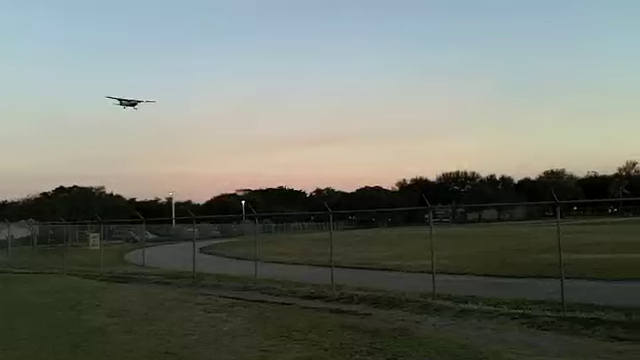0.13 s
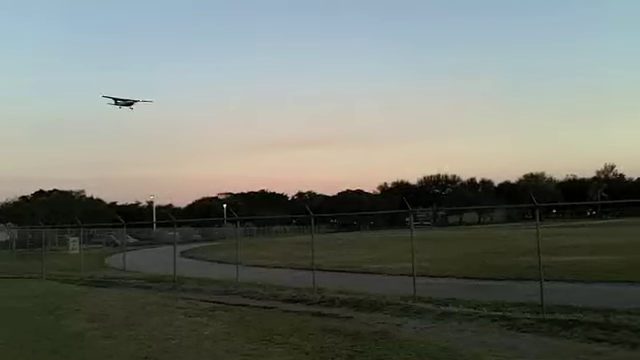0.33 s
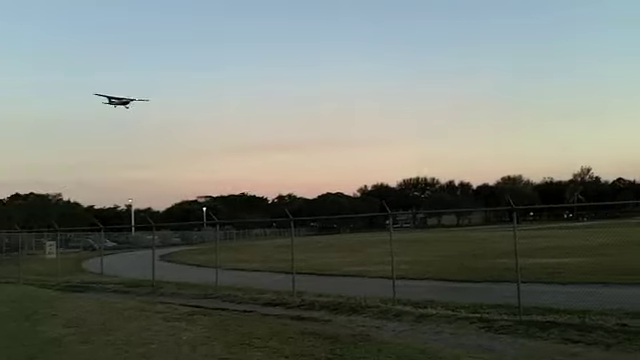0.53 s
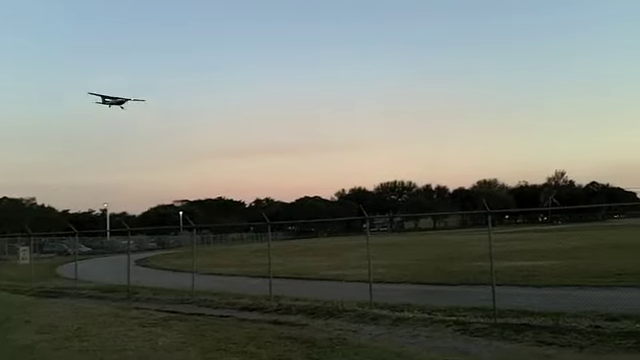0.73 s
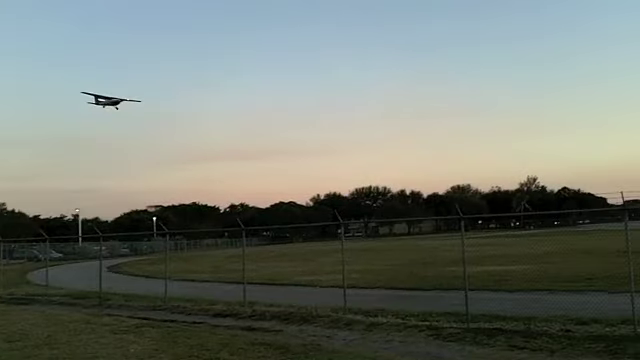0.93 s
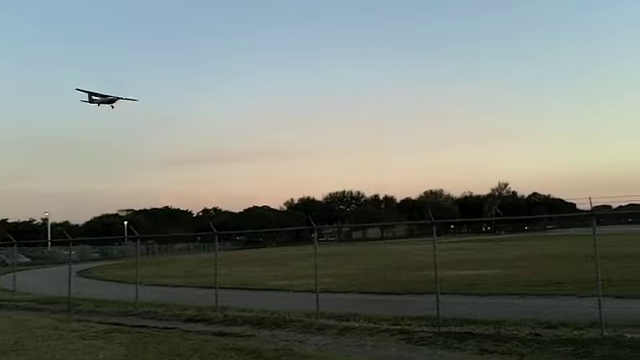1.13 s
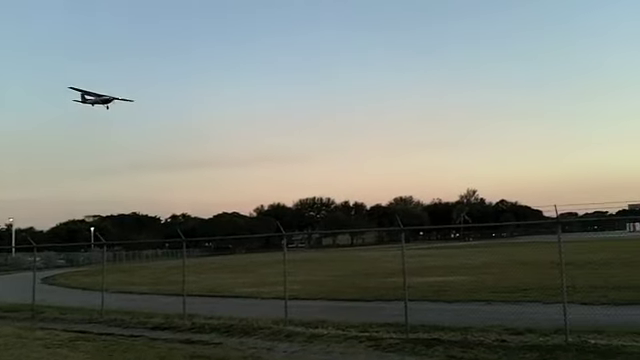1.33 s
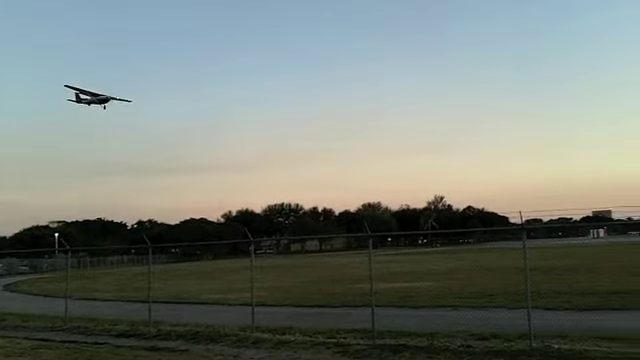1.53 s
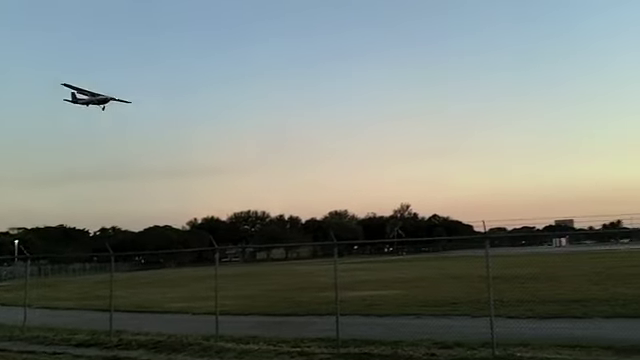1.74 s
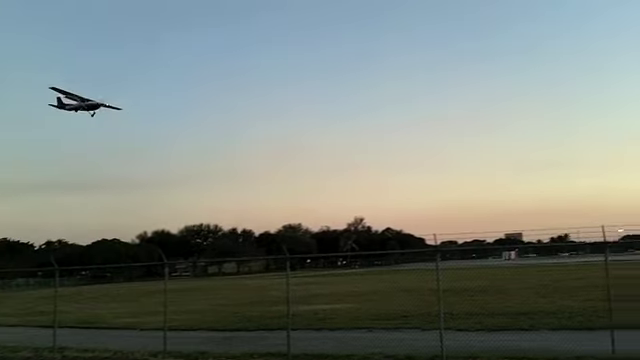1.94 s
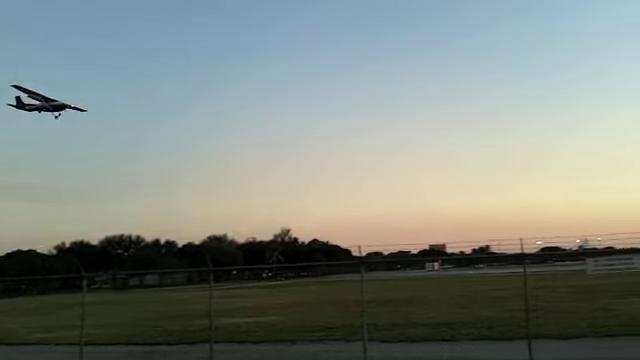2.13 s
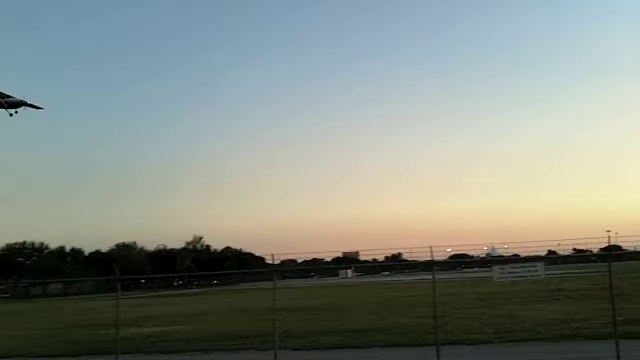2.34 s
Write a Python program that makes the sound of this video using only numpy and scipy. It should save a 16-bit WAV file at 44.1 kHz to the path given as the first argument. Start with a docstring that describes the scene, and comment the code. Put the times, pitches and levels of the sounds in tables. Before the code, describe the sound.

A small propeller plane drones in low over an open airfield, growing louder and brighter as it nears the microphone while its pitch slowly sinks. Further off, idling engines throb and clatter over a low rumble.

```python
"""An airfield, with a small propeller plane coming in low. Its drone sinks in pitch and grows louder and
brighter as it nears, and its exhaust ticks once a shaft turn. Sound bouncing off the ground arrives ever
later and mixes with it in a slow downward sweep. Further off, idling engines throb against the drone.
The recorder fades in, whines faintly and cuts a few deep notches in the treble."""
import sys
import numpy as np
from scipy.fft import rfft, irfft, next_fast_len
from scipy.io import wavfile
from scipy.ndimage import map_coordinates

SR = 44100
rng = np.random.default_rng(int(sys.argv[2]) if len(sys.argv) > 2 else 0)


def master(y):
    """Save y as 16-bit WAV."""
    cut = np.clip(np.atleast_2d(y).T, -1, 1)
    pcm = np.round(cut * 32767)  # scale
    wavfile.write(sys.argv[1], SR, pcm.astype(np.int16))


N = 110250


def amp(db):
    """Turn decibels into a gain."""
    return 10 ** (np.asarray(db) / 20)


def unit(x):
    """Scale x to an average (rms) level of 1."""
    return x / np.sqrt(np.mean(x ** 2) + 1e-20)


def along(points, hz):
    """Read a table at hz, between its rows on a log axis."""
    f, v = np.transpose(points)
    return np.interp(np.log(hz + 1), np.log(f + 1), v)


def curves(rows):
    """One value per sample for each column after the time."""
    times, *columns = np.transpose(rows)
    return [np.interp(np.arange(N) / SR, times, column) for column in columns]


def wobble(rate):
    """Glide through rate random values a second."""
    return map_coordinates(rng.standard_normal(N // 100), [np.arange(N) * rate / SR + 2], mode="wrap")


def filtered(x, response):
    """Scale each frequency in x by response(hz)."""
    size = next_fast_len(N + SR // 2)
    return irfft(rfft(x, size) * response(np.fft.rfftfreq(size, 1 / SR)), size)[:N]


def noise(spectrum):
    """Noise of level 1; the table sets only its tone colour."""
    return unit(filtered(rng.standard_normal(N), lambda hz: amp(along(spectrum, hz))))


def tone(db, angle):
    """A pure tone that starts anywhere in its cycle."""
    return np.sqrt(2) * amp(db) * np.sin(angle + 2 * np.pi * rng.random())


def puffs(rate, decay_s, scatter_db, attack_s):
    """The rise and fall of one puff a cycle, each with its own strength."""
    turns = np.cumsum(rate) / SR
    age = turns % 1 / rate
    strength = amp(scatter_db * rng.standard_normal(N)[turns.astype(int)])
    return unit(strength * (1 - np.exp(-age / attack_s)) * np.exp(-age / decay_s))


# thin, high tones: f/Hz, level/dB
WHINE_TONES = [(11540, -93), (13965, -88), (14565, -92)]
def whine(flicker_hz=26.6):
    """The recorder's electronics give off faint tones that flicker together."""
    t = np.arange(N) / SR
    flicker = 1 + np.cos(2 * np.pi * flicker_hz * t)
    return sum(amp(db) * unit(flicker * np.sin(2 * np.pi * hz * t)) for hz, db in WHINE_TONES)


# tone colour of the background: f/Hz, level/dB
AIRFIELD_COLOUR = [(10, -27), (26, -12), (42, 2.5), (62, 1), (100, -0.5), (150, -5), (200, -10), (320, -24),
                   (1000, -16), (4000, -33.5), (8000, -59), (15000, -57.5)]
def airfield():
    """A steady low rumble with a faint hiss."""
    return amp(-37.5) * noise(AIRFIELD_COLOUR)


# how often each idling engine fires, nearest first: f/Hz
FIRING_HZ = [39.7, 54.2, 33.95]
# one row per engine: level/dB at 1, 2, 3 and 4 times its firing rate
IDLE_LEVELS = [(-46.5, -35.5, -37.5, -47.5), (-54, -42, -46.5, -55), (-59, -43.5, -42, -63)]
def idling_engines():
    """Each engine fires almost evenly, which makes a deep throb."""
    throb = np.zeros(N)
    for firing_hz, levels in zip(FIRING_HZ, IDLE_LEVELS):
        angle = 2 * np.pi * np.cumsum(firing_hz * (1 + 0.0018 * wobble(3.2))) / SR
        for multiple, db in enumerate(levels, 1):
            throb += tone(db + 0.52 * wobble(3), multiple * angle)
    return throb


# tone colour of the clatter: f/Hz, level/dB
CLATTER_COLOUR = [(150, -11), (330, -18), (480, -2), (680, -6), (1000, 0.5), (1400, 3), (1900, -1),
                  (2400, -11.5), (4200, -8), (5200, -10.5), (6500, -18.5), (9000, -38), (15000, -58)]
def idle_clatter():
    """The nearest idling engine clatters: its noise jumps at each firing."""
    firings = puffs(np.full(N, FIRING_HZ[0]), decay_s=0.01, scatter_db=3.5, attack_s=0.00085)
    return amp(-47.5) * noise(CLATTER_COLOUR) * unit(firings + 0.78)


# tone colour of the plane's hiss: f/Hz, level/dB
HISS_COLOUR = [(200, -38), (1500, -16), (3000, 1.5), (4300, 5), (5500, -14), (7500, -22), (12000, -28),
               (15000, -33)]
def close_hiss(approach_db):
    """Treble that the air lets through only when the plane is near."""
    return amp(-50 + 2.2 * approach_db) * noise(HISS_COLOUR)


# tone colour of the ticks: f/Hz, level/dB
TICK_COLOUR = [(500, -24), (2500, -6), (4200, 3), (5400, 2), (6300, 5), (8000, -13), (9100, -3.5),
               (10200, -20), (11500, -25), (15000, -30)]
def exhaust_ticks(shaft_hz, approach_db):
    """The exhaust lets out one sharp puff each time the shaft turns."""
    gas = amp(-52.5 + 2.34 * approach_db) * noise(TICK_COLOUR)
    return gas * puffs(shaft_hz, decay_s=0.0023, scatter_db=2.5, attack_s=0.0034)


# tone colour of the rushing air: f/Hz, level/dB
RUSH_COLOUR = [(20, -3), (60, 0.5), (150, 4), (250, 8.5), (400, -2.5), (520, 0.5), (700, 2), (950, -6.5),
               (1700, 0), (2300, -7), (4200, -3.5), (5000, -6), (6500, -18.5), (9000, -31), (15000, -43)]
def air_rush(shaft_angle, approach_db, firings_per_turn=2):
    """Propeller and exhaust make a rush that pulses with each firing of the engine."""
    pulsing = 1 + 0.26 * np.cos(firings_per_turn * shaft_angle)
    return amp(-41.5 + approach_db + 0.2 * wobble(6.9)) * unit(noise(RUSH_COLOUR) * pulsing)


# the drone's tones: multiple of the shaft rate, level/dB, how strongly it follows the approach
DRONE_TONES = [(1, -49, 0), (2, -35, 0.78), (3, -38.5, .5), (4, -48.5, 1.5), (5, -46.5, 0.6),
               (6, -49.5, 1.12), (7, -52.5, 2), (8, -54.5, 0.96), (9, -68, -0.5), (10, -67.5, -0.67),
               (11, -61, 0.26), (15, -56, 3.3), (16, -61, -0.3)]
def drone(shaft_angle, approach_db):
    """Tones in step with the shaft; most swell as the plane nears."""
    return sum(tone(db + swell * approach_db + 0.28 * wobble(8.4), multiple * shaft_angle)
               for multiple, db, swell in DRONE_TONES)


# shaft turns a second, as heard: t/s, f/Hz
SHAFT_RATE = [(0, 48.8), (.4, 48.36), (.8, 47.04), (1.4, 45.74), (2, 44.86), (2.5, 44.1)]
# the plane drawing near: t/s, level/dB, delay of the ground bounce/ms
APPROACH_PATH = [(0, -9.5, 1.83), (.6, -7, 2.1), (1.15, -7, 2.33), (1.45, -4, 2.56), (1.75, -2, 2.59),
                 (2.08, -1.5, 2.82), (2.35, .5, 2.94), (2.5, 1, 3.1)]
# how much sound the ground throws back: f/Hz, gain
GROUND_BOUNCE = [(50, 0.36), (300, 0.55), (700, 0.81), (1500, 0.3), (3000, 0.3)]
def plane():
    """The plane is heard directly and off the ground; the late copy weakens some pitches."""
    shaft_hz, = curves(SHAFT_RATE)
    approach_db, delay_ms = curves(APPROACH_PATH)
    shaft_angle = 2 * np.pi * np.cumsum(shaft_hz) / SR
    direct = drone(shaft_angle, approach_db) + air_rush(shaft_angle, approach_db)
    direct += exhaust_ticks(shaft_hz, approach_db) + close_hiss(approach_db)
    bounce = filtered(direct, lambda hz: along(GROUND_BOUNCE, hz))
    late_bounce = map_coordinates(bounce, [np.arange(N) - delay_ms * SR / 1000])
    return direct + late_bounce


def scene():
    """The plane over the sounds of the airfield, in mono."""
    return (plane() + idling_engines() + idle_clatter() + airfield() + whine())[None]


# narrow bands the recorder cuts out: f/Hz, half width/Hz
TREBLE_NOTCHES = [(2730, 430), (5480, 600), (7900, 590), (10950, 530)]
def record(dry, silent_s=0.083, fade_s=0.096, top_hz=15250):
    """The recorder fades in, notches the treble and keeps nothing above top_hz."""
    def response(hz):
        notches = [abs(hz - centre) / np.hypot(hz - centre, width) for centre, width in TREBLE_NOTCHES]
        return np.prod(notches, axis=0) * (hz < top_hz)
    fade = np.clip((np.arange(N) / SR - silent_s) / fade_s, 0, 1)
    return filtered(dry[0] * fade, response)[None]


dry = scene()
out = record(dry)
master(out)
```